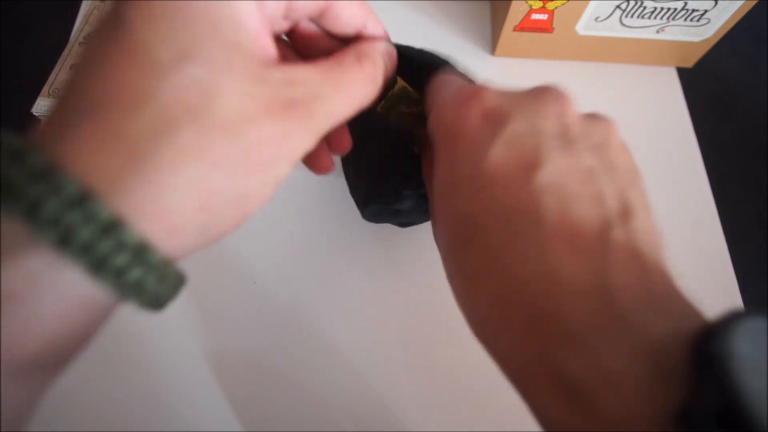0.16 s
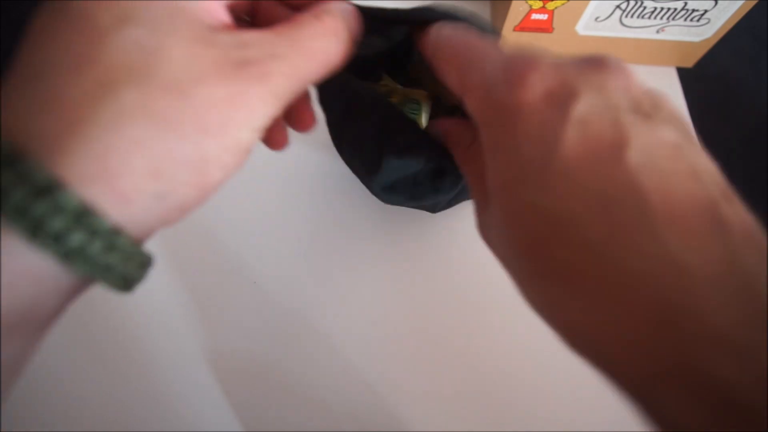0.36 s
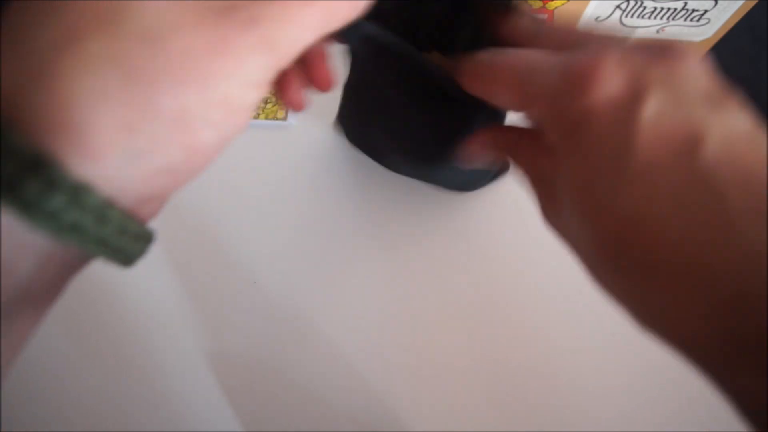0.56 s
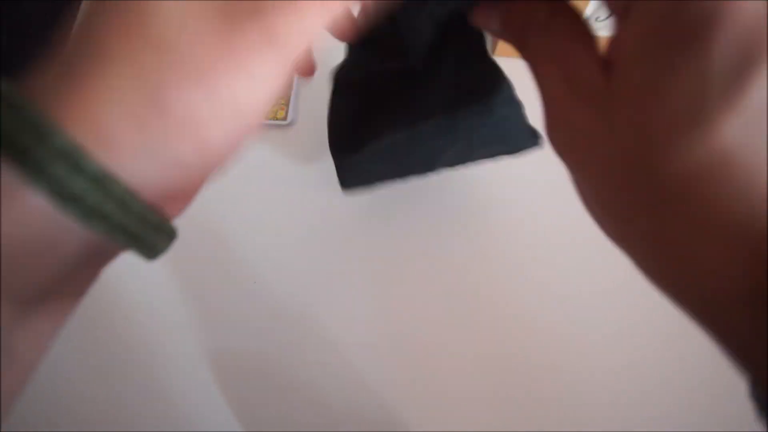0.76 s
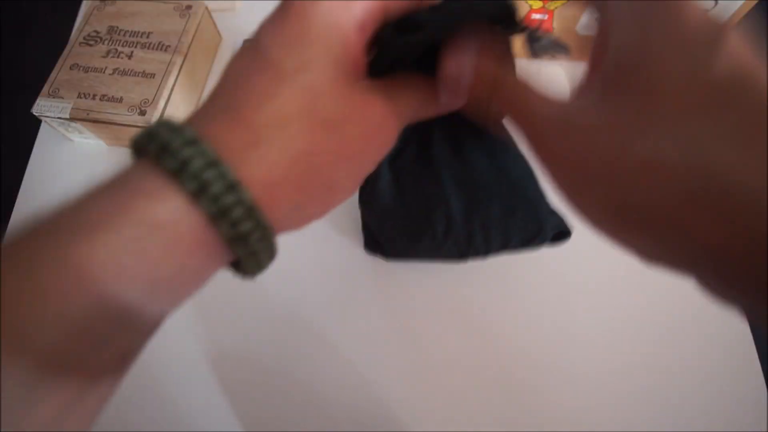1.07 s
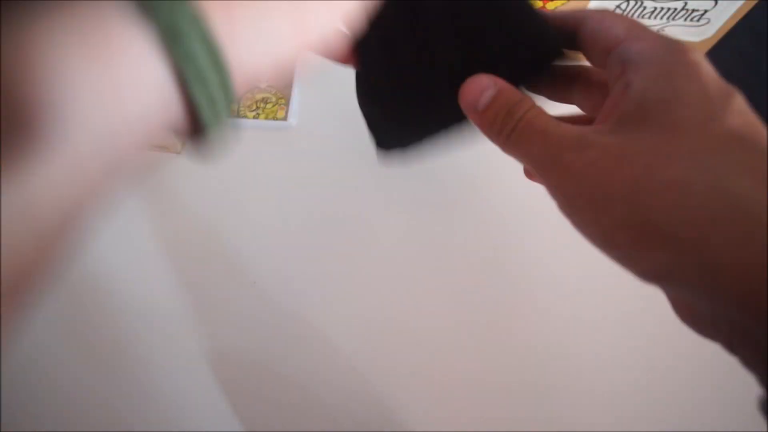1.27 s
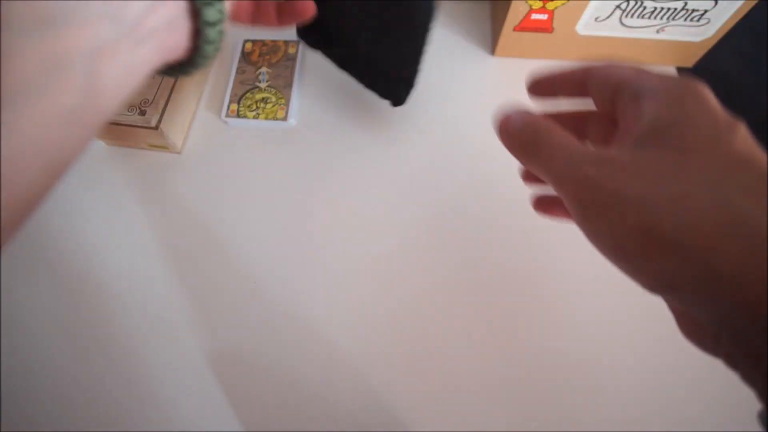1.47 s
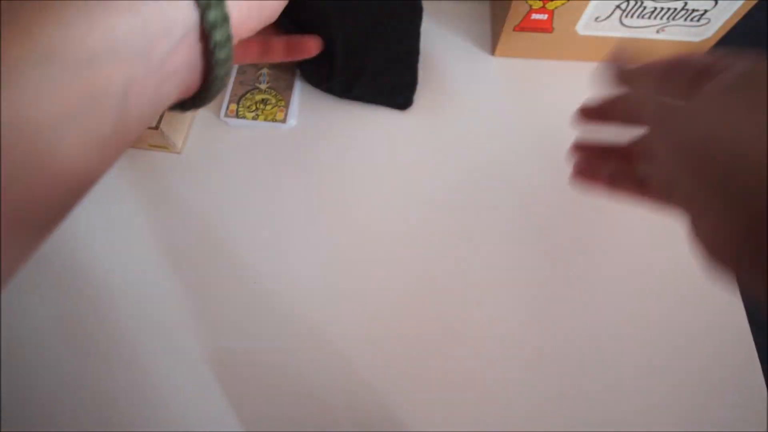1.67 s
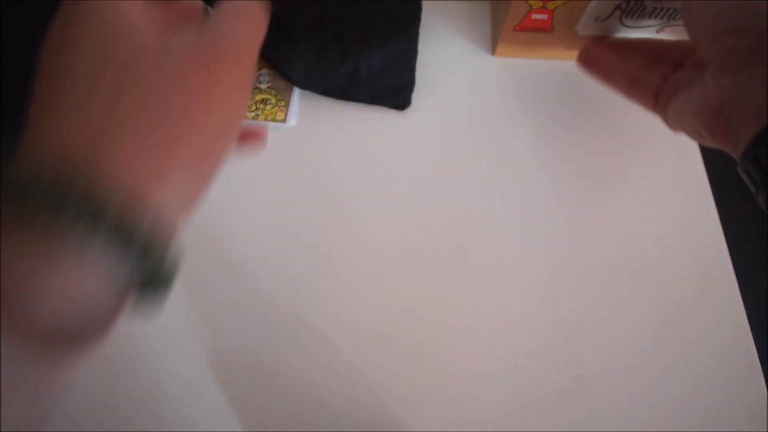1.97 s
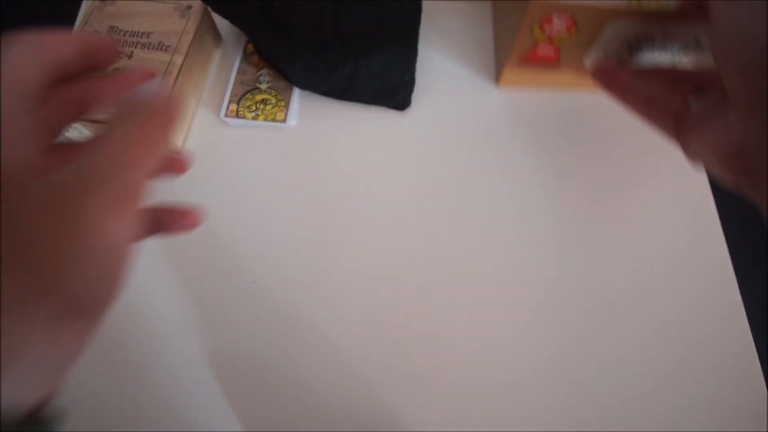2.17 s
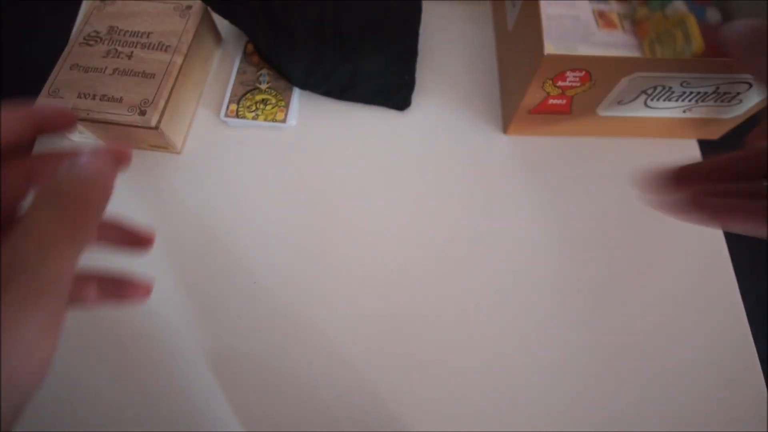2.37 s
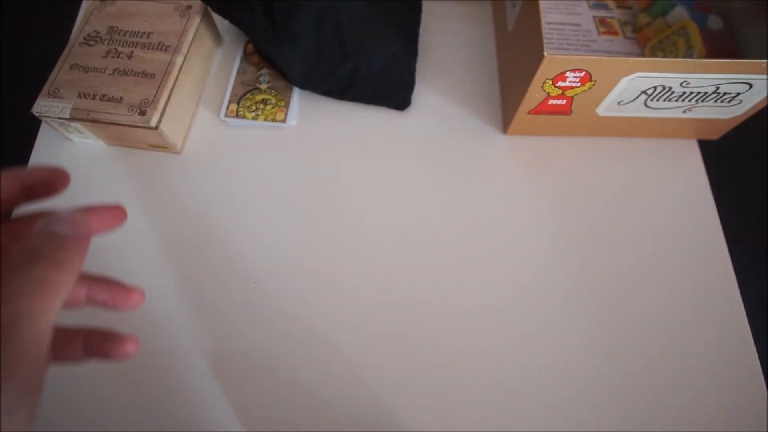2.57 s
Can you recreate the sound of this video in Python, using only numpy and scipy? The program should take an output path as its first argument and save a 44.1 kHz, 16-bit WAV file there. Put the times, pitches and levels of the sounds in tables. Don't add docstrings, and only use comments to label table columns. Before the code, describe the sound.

Cardboard tiles in a cloth bag: a quick cluster of dry clicks at 0.1-0.2 s, scattered ticks and rustling around 0.5, a hollow table thud at 0.9, a sharp snap at 1.0. Cloth swishes near 1.3, then a louder, fuller thud at 1.6. Small cardboard taps at 1.95, a box hissing across the table from 2.1, a knock at 2.38. Close, small room, faint hiss.

```python
import sys
import numpy as np
from scipy import signal
from scipy.fft import rfft, irfft, next_fast_len
from scipy.io import wavfile
from scipy.ndimage import uniform_filter1d

SR = 44100
rng = np.random.default_rng(int(sys.argv[2]) if len(sys.argv) > 2 else 0)


def master_out(mix):
    frames = np.transpose(np.atleast_2d(mix))
    ceiling = np.clip(frames, -1, 1)
    pcm = np.round(ceiling * 32767).astype(np.int16)
    wavfile.write(sys.argv[1], SR, pcm)


def amplitude_ratio(level_db):
    exponent = np.asarray(level_db, float) / 20
    return 10 ** exponent


N = 119070
HZ = np.fft.rfftfreq(N, 1 / SR) + 1e-3
TIME = np.arange(N) / SR
CRACK_T60_S = 0.011

# start_s, peak_db, contact_cut_hz, puff_db, slump_db
LANDINGS = [
    (0.883, -10, 1540, -25.5, -31),
    (1.595, -5.5, 1440, -16.5, -30),
    (2.378, -10, 2500, -29, -38),
]
# start_s, peak_db
TOUCHES = [
    (.092, -30.5),
    (0.143, -25.5),
    (0.166, -30),
    (.203, -44),
    (0.454, -31.5),
    (0.984, -34),
    (1.059, -28),
    (2.064, -26),
    (2.104, -9.5),
    (2.132, -22),
]


def rms_one(x):
    return x / np.sqrt(np.mean(x ** 2) + 1e-20)


def at_hz(points):
    hz, value = np.transpose(points)
    return np.interp(np.log(HZ), np.log(hz), value)


def drift(rate_hz):
    r = np.exp(-2 * np.pi * rate_hz / SR)
    slow = rng.standard_normal(N + SR)
    for _ in range(2):
        slow = signal.lfilter([1 - r], [1, -r], slow)
    return rms_one(slow[SR:])


def ring(clicks, hz, t60):
    r = amplitude_ratio(-60 / (t60 * SR))
    w = 2 * np.pi * hz / SR
    return signal.lfilter([0, np.sin(w)], [1, -2 * r * np.cos(w), r * r], clicks + 1e-18)


def rub(spectrum, rings, grains_per_s, patchy_db, spread):
    caught = rng.random((3, N)) < grains_per_s / SR
    grains = caught * amplitude_ratio(2.6 * np.minimum(rng.exponential(1, (3, N)), 5))
    source = rng.standard_normal((3, N)) * (1 + grains)
    share = np.clip(spread, 0, 1)
    pair = np.sqrt(1 - share) * source[0] + np.sqrt(share) * source[1:]
    peaks = sum(amplitude_ratio(db) / (1 + (2 * (HZ - hz) / width) ** 2) for hz, width, db in rings)
    coloured = rfft(pair) * amplitude_ratio(at_hz(spectrum)) * (1 + peaks)
    shared, out = drift(15.0), 0
    for centre in np.log([500., 2500., 11000.]):
        weight = np.exp(-(np.log(np.maximum(HZ, 300)) - centre) ** 2 / 1.4)
        out = out + amplitude_ratio(patchy_db * (shared + drift(90))) * irfft(coloured * weight, N)
    return rms_one(out)


def knock(rows, modes, flutter_db, slump_db):
    soft, shake = 0, rng.standard_normal(N)
    for s, db, cut_hz, *_ in rows:
        since = np.maximum(TIME - s, 0)
        slump = np.exp(-since / 0.037)
        click = shake * (since > 0) * amplitude_ratio(db + slump_db) * slump / 10
        click[int(s * SR)] = amplitude_ratio(db - 15.5)
        soft = soft + signal.sosfilt(signal.butter(2, cut_hz, fs=SR, output="sos"), click)
    out = 0
    for k, (hz, level_db, t60) in enumerate(modes):
        unsettled_db = level_db + np.roll(flutter_db, 5000 * k)
        out = out + amplitude_ratio(unsettled_db) * ring(soft, hz, t60)
    return out


def ports(pair, lead_s, balance):
    turn = np.exp(1j * np.pi * HZ * lead_s) * amplitude_ratio(at_hz(balance) / 2)
    return irfft(rfft(pair) * np.array([turn, 1 / turn]), N)


def room_tone():
    # pitch_hz, level_db (per Hz)
    tone = [(30, -24), (100, -12), (300, 0), (900, 0), (2000, -3), (4500, -2.5), (12000, -4), (16000, -5)]
    return amplitude_ratio(-51.5) * rub(tone, [], 10, patchy_db=.3, spread=1)


def rumble(one_port):
    # pitch_hz, level_db (per Hz)
    low_noise = [(20, -22), (100, -6.5), (160, -1.5), (250, -30), (16000, -90)]
    swell = uniform_filter1d(np.abs(one_port), size=4000) ** .3
    return amplitude_ratio(-60) * swell * rub(low_noise, [], 10, patchy_db=0.0, spread=1.0)


def room(x):
    t60_s, wall_cut_hz = 0.55, 4500
    size = next_fast_len(N + SR)
    w = 2 * np.pi * np.fft.rfftfreq(size, 1 / SR)
    dull = 1 / (1 + 1j * w / (2 * np.pi * wall_cut_hz))
    loops = np.zeros((2, len(w)), complex)
    for k, lag in enumerate(rng.uniform(.017, .065, 20)):
        once = amplitude_ratio(-60 * lag / t60_s) * np.abs(dull) ** (lag * 30) * np.exp(-1j * w * lag)
        loops[k % 2] += (-1) ** (k // 2) * once / (1 - once)
    return irfft(rfft(x, size) * loops, size)[:, :N]


def thumps():
    thump_hz = 54.5
    click = np.zeros(N)
    for s, db, *_ in LANDINGS + TOUCHES:
        click[int(s * SR)] = amplitude_ratio(db - 34)
    return ring(click, thump_hz, 0.034) + amplitude_ratio(-10.0) * ring(click, 2 * thump_hz, 0.23)


def nudges():
    # start_s, peak_db, contact_cut_hz, crack_db
    jogs = [
        (1.925, -23.5, 3930, -47),
        (1.947, -15.5, 4020, -29.5),
        (1.959, -15, 3000, -21),
        (1.972, -17.5, 3000, -20),
        (1.985, -23, 3000, -31),
        (1.994, -18, 1740, -34),
        (2.015, -24, 1200, -50),
        (2.045, -22, 2000, -29.5),
    ]
    # pitch_hz, level_db, t60_s
    flap = [(353, 3.5, 0.023), (657, 6, 0.047), (980, 9.5, 0.0083), (1330, 1, 0.028), (1900, 8.5, 0.016),
            (3130, 5, 0.015), (4970, -11, 0.0089), (6850, -9, .008)]
    cracks = 0
    for s, _, _, db in jogs:
        cracks = cracks + amplitude_ratio(db - 60 * np.maximum(TIME - s, 0) / CRACK_T60_S) * (TIME > s)
    bright_noise = np.diff(rng.standard_normal(N + 1))
    return knock(jogs, flap, 0, slump_db=-46) + cracks * bright_noise


def box():
    # start_s, level_db
    sliding = [
        (2.041, -53),
        (2.058, -47),
        (2.072, -35.5),
        (2.107, -20.5),
        (2.2, -18.5),
        (2.33, -20),
        (2.359, -19.5),
        (2.385, -33.5),
        (2.42, -56),
    ]
    # pitch_hz, level_db (per Hz)
    slide = [(88, -77), (150, -1.5), (249, -11.5), (555, -7.5), (790, -5), (998, -8.5), (1900, -13.5),
             (11300, -3), (16000, -4)]
    # pitch_hz, width_hz, level_db
    slide_rings = [(254, 59, 1), (820, 53, 9), (1886, 280, 12.5), (2920, 810, 6.5), (4870, 920, 0)]
    level = np.interp(TIME, *np.transpose(sliding), left=-90, right=-90)
    hiss = rub(slide, slide_rings, 12000, patchy_db=1.0, spread=0.33)
    return amplitude_ratio(level + 6.5) * hiss + nudges()


def table():
    # pitch_hz, level_db, t60_s
    table_first = [(267.3, -4.5, 0.23), (290, 0.5, 0.044), (412, -11.5, 0.072), (640, -4, 0.12),
                   (705, -5, 0.042), (800, -8, 0.041), (893, 2.5, 0.069), (922, 5.5, 0.073),
                   (1009, -1, 0.12), (1140, -3, 0.18), (1516, -6, 0.053)]
    # pitch_hz, level_db, t60_s
    table_second = [(262.2, -3.5, 0.4), (294.6, 7, 0.14), (370, -10, 0.34), (426, -12, 0.27),
                    (555, -9.5, 0.25), (609.6, -7, 0.34), (645.5, 2.5, 0.27), (676, -2, 0.23),
                    (790, -2, 0.087), (1350, -18, 0.03)]
    # pitch_hz, level_db, t60_s
    box_modes = [(291, -1, 0.052), (487.5, 3.5, 0.067), (595, 0, .04), (753, 1, 0.036), (924, 7.5, 0.072),
                 (927, -9.5, 0.48), (933, -11.5, 0.46), (995, 4, 0.058), (1390, 12, 0.022),
                 (1940, 5, 0.029), (2370, 6, 0.021)]
    # pitch_hz, level_db (per Hz)
    puff = [(590, 2), (1000, 0.5), (1380, -4.5), (2590, -8.5), (2840, -6.5), (3840, -13), (16000, -16.5)]
    # start_s, peak_db, contact_cut_hz
    bounces = [
        [(.886, -7, 1210), (.908, -16.5, 1290), (.962, -22.5, 1300), (1.004, -22, 1300)],
        [(1.598, -9, 464), (1.617, -16, 2200), (1.643, -18, 900), (1.701, -19, 1310), (1.743, -24, 900),
         (1.796, -32, 900)],
        [(2.381, -3, 2010), (2.394, -6, 915)],
    ]
    rattle = rub(puff, [], 2000, patchy_db=1.2, spread=.3)
    flutter_db = 3.5 * drift(35)
    touches = [(s, db, 900) for s, db in TOUCHES]
    out = knock(touches, table_second, flutter_db, slump_db=-33) + np.zeros((2, N))
    all_modes = (table_first, table_second, box_modes)
    for (s, db, cut_hz, puff_db, slump_db), after, modes in zip(LANDINGS, bounces, all_modes):
        since = np.maximum(TIME - s, 0)
        fade = amplitude_ratio(-60 * since / 0.2) + amplitude_ratio(-10.5 - 60 * since / 0.43)
        out += knock([(s, db, cut_hz), *after], modes, flutter_db, slump_db)
        out += rattle * (since > 0) * amplitude_ratio(puff_db) * fade
    return out


def cloth():
    # start_s, level_db
    handling = [(0, -28.5), (.07, -32.5), (.18, -34.5), (.215, -42.5), (.4, -41.5), (.45, -37.5),
                (.55, -40.5), (.645, -44), (.7, -30.5), (.76, -35), (.845, -43.5), (.89, -27),
                (.945, -48.5), (1.0, -24.5), (1.05, -34), (1.095, -28.5), (1.165, -55), (1.2, -36.5),
                (1.275, -38), (1.305, -41.5), (1.35, -35.5), (1.39, -36), (1.43, -42), (1.51, -37.5),
                (1.535, -52)]
    # pitch_hz, level_db (per Hz)
    rustle = [(1500, -7), (3000, -30), (4000, -1), (5000, -5.5), (6300, 2), (9000, 1.5), (12500, 8),
              (16000, 6.5)]
    # start_s, level_db, length_s
    swishes = [(.4925, -34, .0015), (.5015, -32, .0015), (.5085, -34, .0015), (.522, -26, .0015),
               (.527, -32, .002), (.538, -33, .004), (.5445, -30, .0015), (.974, -26, .006),
               (1.265, -38, .012), (1.322, -29, .004), (1.332, -21, .003), (1.338, -19, .004),
               (1.348, -31, .008), (1.432, -33, .01), (1.625, -33, .02)]
    # pitch_hz, level_db (per Hz)
    swish = [(590, -59), (1000, -19), (2870, -32), (3270, -20), (8360, -18.5), (12000, -0.5),
             (16000, -10.5)]
    level = np.interp(TIME, *np.transpose(handling), right=-50)
    level = level - 30 * (TIME > 2.1)
    strokes = sum(amplitude_ratio(db) * np.exp(-((TIME - s) / length) ** 2) for s, db, length in swishes)
    out = amplitude_ratio(level) * rub(rustle, [], 1000, patchy_db=.8, spread=0.73)
    return out + strokes * rub(swish, [], 4000, patchy_db=.5, spread=.3)


def shifting_tiles():
    # start_s, level_db
    shifting = [(0, -31), (.035, -40), (.07, -46), (.14, -34), (.2, -47.5), (.3, -56.5), (.45, -44),
                (.55, -42.5), (.64, -52.5), (.7, -44.5), (.76, -52.5), (.86, -50), (.89, -39), (1.1, -40),
                (1.17, -58.5), (1.2, -41.5), (1.27, -46.5), (1.34, -43), (1.42, -40), (1.5, -46.5),
                (1.55, -52.5), (1.9, -49.5)]
    # pitch_hz, level_db (per Hz)
    shuffle = [(88, -65), (150, -9), (274, -0.5), (464, -14.5), (623, -6), (811, -9), (1030, -6.5),
               (1440, -8.5), (5000, -13), (6500, -58), (11000, -120)]
    level = np.interp(TIME, *np.transpose(shifting), right=-70)
    pile = amplitude_ratio(level) * rub(shuffle, [], 3500, patchy_db=3.0, spread=0.56)
    squeak_s, squeak_length_s = 0.42, 0.18
    squeak = rng.standard_normal(N) * amplitude_ratio(-41 + 2.6 * drift(33))
    squeak = squeak * np.exp(-((TIME - squeak_s) / squeak_length_s) ** 4)
    return pile + ring(squeak, 3175, 0.0092) / 10


def ticks():
    # start_s, peak_db, ring_hz, crack_db (against the ring)
    tile_ticks = [(.027, -26, 840, -20), (0.087, -15.5, 1370, -10), (0.102, -9.5, 1430, -26),
                  (0.116, -10.5, 1340, -14), (0.136, -2, 1960, -8), (0.162, -6, 1440, 0.5),
                  (.124, -26, 1085, -12), (.15, -9, 3140, -6), (0.181, -16, 1560, -3),
                  (0.318, -23.5, 1200, -28), (0.353, -31, 720, -10), (0.453, -13, 3000, 3.5),
                  (0.491, -21.5, 1290, -12), (0.499, -15.5, 1900, 1.5), (0.52, -12, 1330, 3),
                  (0.991, -3.5, 3270, -3), (.985, -22, 710, -15), (1.196, -26, 1300, 5),
                  (1.21, -28, 1300, 6.5), (1.403, -15, 1350, 12), (1.41, -13, 3200, -9),
                  (1.427, -25, 1320, 9), (1.505, -32, 800, 7.5),
                  (.394, -23.5, 1270, -18),
        (0.542, -24.5, 1070, 13.5),
        (0.898, -9, 4640, 11),
        (0.999, -4, 4870, -2),
    ]
    # pitch_hz, level_db, t60_s
    tile_mode = (3180, -22.5, 0.046)
    mode_hz, mode_db, mode_t60 = tile_mode
    ring_cycles, late_s = 12.7, .001
    out, t = np.zeros(N), TIME[:SR // 20]
    bright = signal.butter(1, [2500, 9400], "band", fs=SR, output="sos")
    for s, db, hz, crack_db in tile_ticks:
        body = np.sin(2 * np.pi * hz * t) + amplitude_ratio(-8) * np.sin(2 * np.pi * 0.655 * hz * t)
        body = body * amplitude_ratio(-60 * t * hz / ring_cycles) * (1 - np.exp(-t / .0003))
        body = body + np.sin(2 * np.pi * mode_hz * t) * amplitude_ratio(mode_db - 60 * t / mode_t60)
        burst = amplitude_ratio(-60 * t / CRACK_T60_S) * (1 - np.exp(-t / 0.00074))
        crack = signal.sosfilt(bright, rng.standard_normal(len(t)) * burst)
        i = int((s + late_s) * SR)
        out[i:i + len(t)] += amplitude_ratio(db - 2) * (body + amplitude_ratio(crack_db) * crack)
    return out


def bag():
    return cloth() + shifting_tiles() + ticks()


def scene():
    # pitch_hz, balance_db
    bag_balance = [(200, 1), (2000, 1.5), (15000, 2.1)]
    # pitch_hz, balance_db
    box_balance = [(180, 5), (550, 2), (1650, -5), (5000, -3.5), (15000, 0)]
    near = ports(bag(), -0.000001, bag_balance) + ports(box(), -0.000031, box_balance) + table()
    heard = near + amplitude_ratio(-18) * room(near.mean(axis=0))
    heard = heard / (1 + np.abs(heard / .9) ** 4) ** .25
    bass_cut = signal.butter(5, 250.5, "high", fs=SR, output="sos")
    return signal.sosfilt(bass_cut, heard) + thumps() + room_tone() + rumble(near[0])


def roll_off(x):
    return signal.sosfilt(signal.butter(12, 17020, fs=SR, output="sos"), x)


def record(dry):
    mid, side = dry.mean(axis=0), (dry[0] - dry[1]) / 2
    side = irfft(rfft(side) * (HZ + 60) / np.hypot(HZ, 610), N)
    top_cut = signal.ellip(10, .5, 42, 15900, fs=SR, output="sos")
    mix = signal.sosfilt(top_cut, [mid + side, mid - side])
    return roll_off(mix)


dry = scene()
out = record(dry)
master_out(out)
```